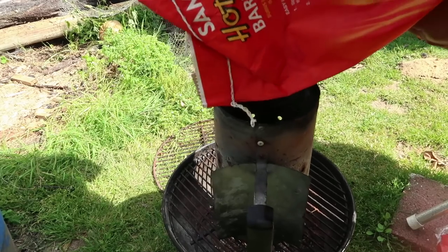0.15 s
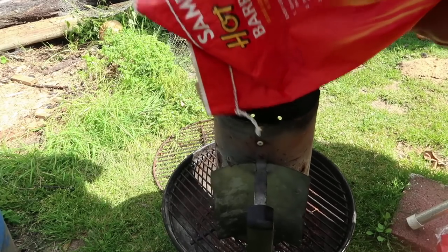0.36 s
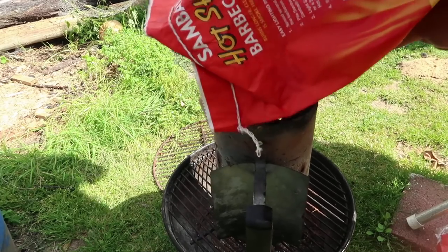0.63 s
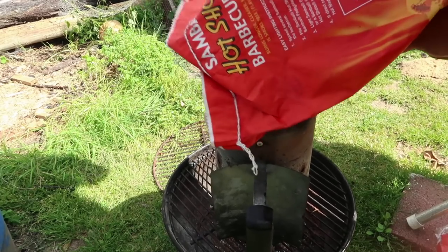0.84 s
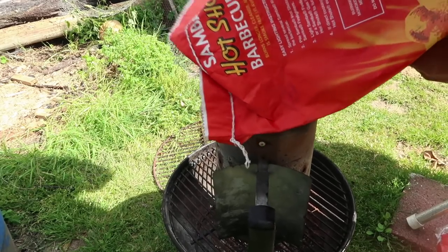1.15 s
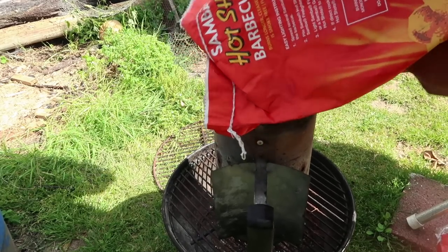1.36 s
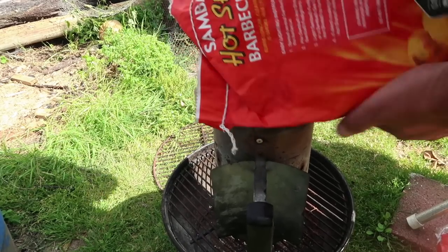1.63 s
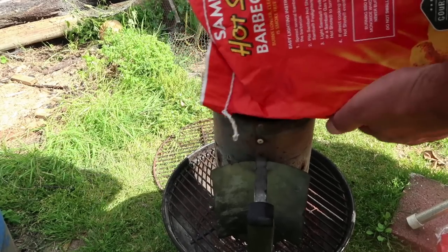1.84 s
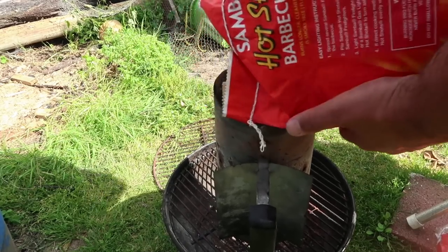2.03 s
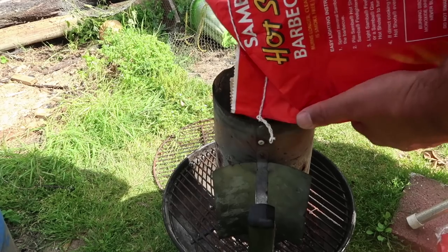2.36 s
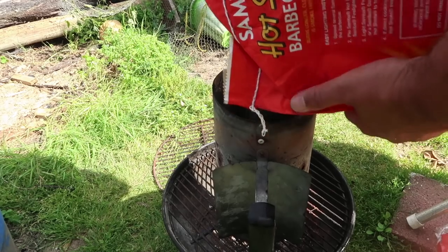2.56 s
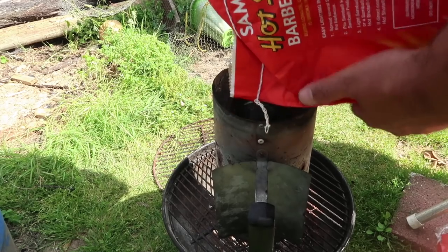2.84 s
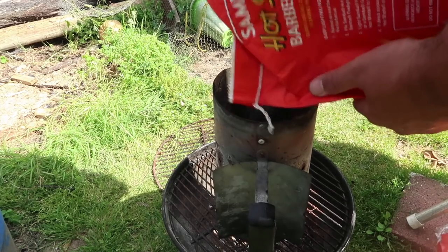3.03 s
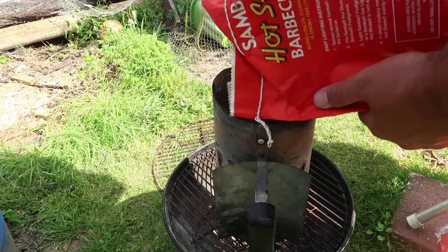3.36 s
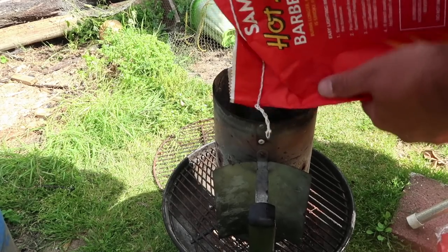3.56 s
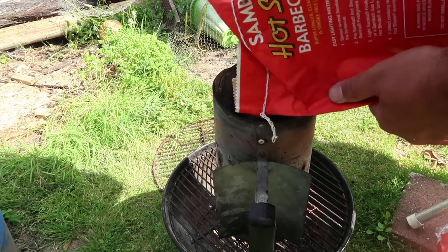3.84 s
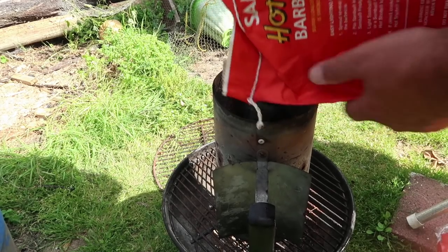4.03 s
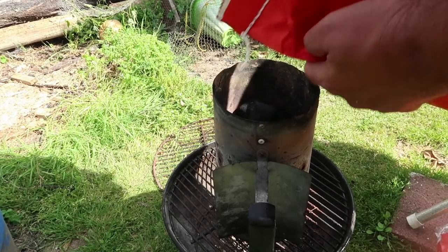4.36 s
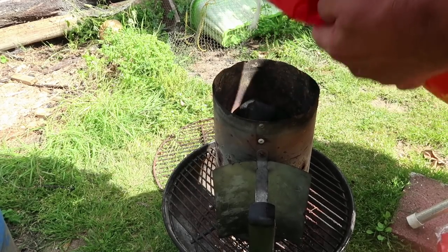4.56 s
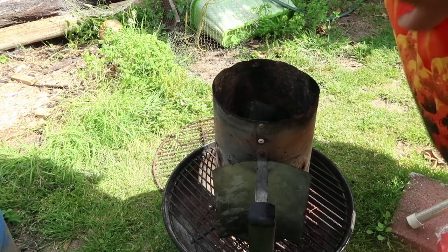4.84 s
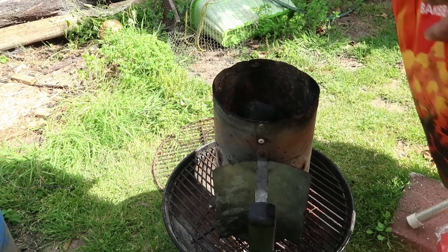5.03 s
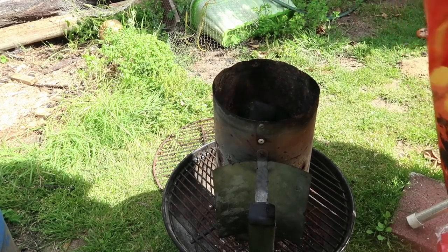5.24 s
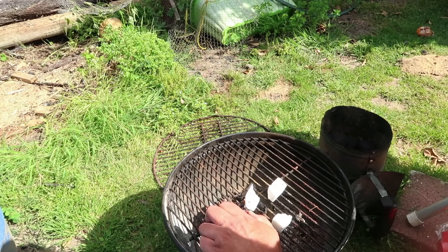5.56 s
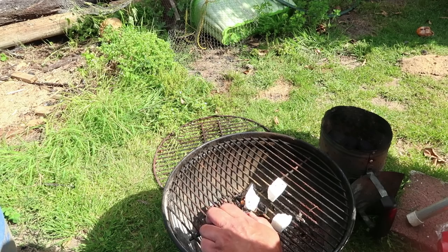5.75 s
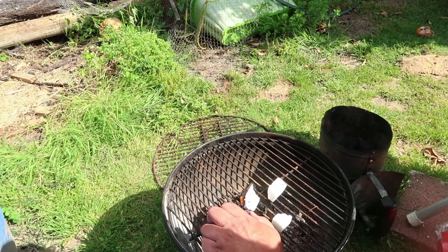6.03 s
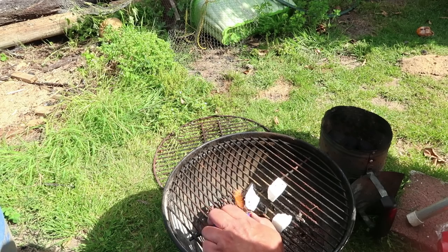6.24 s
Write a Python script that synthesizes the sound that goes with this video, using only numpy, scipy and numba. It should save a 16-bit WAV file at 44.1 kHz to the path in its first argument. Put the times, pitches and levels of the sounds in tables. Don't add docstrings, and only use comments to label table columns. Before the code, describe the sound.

Close up outdoors, charcoal briquettes pour from a paper sack into a metal chimney: dry knocks, brittle clacks and sliding grit over hollow thumps, with a brief metallic ring. The flow comes in surges, thins midway, then returns in heavier bursts. At about 5.3 seconds it cuts off to soft garden air, far traffic, a tiny brush on the grate and a faint hoarse bird.

```python
import sys
import numpy as np
from scipy import signal
from scipy.fft import rfft, irfft
from scipy.io import wavfile
from scipy.ndimage import uniform_filter1d, map_coordinates
from numba import njit

SR = 44100
rng = np.random.default_rng(int(sys.argv[2]) if len(sys.argv) > 2 else 0)


def store_pcm(level_fs):
    pcm = np.round(np.clip(level_fs, -1, 1) * 32767).astype(np.int16)
    wavfile.write(sys.argv[1], SR, np.atleast_2d(pcm).T)


def invert_db(level):
    return 10 ** (np.asarray(level, dtype=float) / 20)


N = 282240
POUR_END_S = 5.353


def read(table, hz):
    x, y = np.transpose(table)[:2]
    return np.interp(np.log(hz), np.log(np.maximum(x, 1)), y)


def walk(rate):
    k = int(SR / rate)
    held = np.repeat(rng.standard_normal(N // k + 1), k)
    return 1.4 * uniform_filter1d(uniform_filter1d(held, k), k)[:N]


def high_pass(hz, x):
    return signal.sosfilt(signal.butter(3, hz, "high", fs=SR, output="sos"), x)


@njit
def add(out, start, turn, fade, gain):
    for k in range(len(start)):
        i = int(start[k]) + 1
        late = i - start[k]
        p = np.exp(1j * turn[k] - fade[k])
        z = gain[k] * np.exp((1j * turn[k] - fade[k]) * late)
        soft, q = np.exp(-turn[k] * late), np.exp(-turn[k])
        for j in range(i, min(i + int(5 / fade[k]), len(out))):
            out[j] += z.imag * (1 - soft)
            z, soft = z * p, soft * q


def rings(s, hz, cycles, gain, place):
    # frequency in Hz, left minus right in dB
    port_balance = [(60, 0.0), (110, 0.0), (200, 0.0), (380, -0.5), (700, -1.0), (1290, -1.5), (2380, -1.5),
                    (4400, -1.5), (8120, -1.0), (15000, -0.5)]
    # frequency in Hz, spread between ports in dB, by where a lump strikes
    port_shade = [(700, 0), (2500, 2), (5000, 7), (8000, 7), (13000, 2.5)]
    # frequency in Hz, lag of the left port in samples
    port_lag = [(1000, .8), (5000, .85), (9000, 1.45), (15000, 1.5)]
    out = np.zeros((2, N))
    hz = np.clip(hz, 30, .38 * SR)
    pan = invert_db((read(port_balance, hz) + read(port_shade, hz) * place) / 2)
    lag = read(port_lag, hz) * (1 - .3 * place)
    turn = (2 * np.pi * hz / SR).ravel()
    fade = (hz / SR / cycles).ravel()
    for side, late, share in zip(out, (lag, 0 * lag), (pan, 1 / pan)):
        add(side, (s * SR + 8 + late).ravel(), turn, fade, (gain * share).ravel())
    return out


def whine():
    # frequency in Hz, rms level in dB
    tone = [(13001, -90)]
    (hz, db), = tone
    return np.sqrt(2) * invert_db(db + 3 * walk(30)) * np.sin(2 * np.pi * hz * np.arange(N) / SR)


def garden():
    # frequency in Hz, level in dB per Hz
    hum_db = [(12, -34), (20, -14), (53, -6.5), (72, -13), (108, -1.5), (132, -12.5), (178, -9), (337, -19),
              (398, -16.5), (560, -21), (720, -17.5), (900, -23.5), (1830, -31), (3860, -37.5),
              (11500, -51.5), (12800, -39), (15000, -64)]
    # frequency in Hz, side minus mid in dB
    width_db = [(60, -39), (110, -53), (200, -27), (380, -16), (700, -23), (1290, -16), (2380, -15),
                (4400, -13), (8120, -14), (15000, 0)]
    level_db, swell_db, flicker_db = -44.5, .3, .6
    f = np.maximum(np.fft.rfftfreq(N, 1 / SR), 20)
    mid, side = (rfft(rng.standard_normal(N)) * invert_db(read(hum_db, f)) for _ in range(2))
    side = (4.0 * side - .6j * mid) * invert_db(read(width_db, f))
    ports = np.array([mid + side, mid - side])
    rustle_db = 3.9 * np.exp(-((np.arange(N) / SR - 5.93) / .025) ** 2)
    out, swell = 0, walk(1.6)
    for hz in 22 * 2 ** np.arange(0., 10.):
        band = np.maximum(1 - abs(np.log2(f / hz)), 0)
        band_db = swell_db * swell + flicker_db * walk(12.0) + rustle_db * (hz > 1500)
        out = out + invert_db(band_db) * irfft(ports * band, N)
    return out * invert_db(level_db) / np.sqrt(np.mean(out.mean(axis=0) ** 2))


def bird():
    # start in seconds, length in seconds, start pitch in Hz, end pitch in Hz, level in dB
    slurs = [
        (6.125, .06, 4050, 3800, -53),
        (6.172, .025, 3600, 3450, -50),
        (6.19, .04, 3200, 3200, -51),
        (6.215, .075, 4480, 4560, -57),
        (6.32, .1, 4550, 4550, -58),
        (6.33, .045, 3900, 3800, -52),
        (6.355, .045, 3400, 3250, -54),
        (6.368, .032, 3000, 2900, -52),
    ]
    out, t = np.zeros(N), np.arange(int(.1 * SR)) / SR
    for s, length, a_hz, b_hz, db in slurs:
        u = np.clip(t / length, 0, 1)
        waver, flutter = uniform_filter1d(rng.standard_normal((2, len(t))), size=200) * 14
        hz = (a_hz + (b_hz - a_hz) * u) * (1 + 0.025 * waver * (a_hz < 4300))
        tone = np.sin(2 * np.pi * np.cumsum(hz) / SR)
        note = invert_db(db - 7.5 + 3 * flutter) * np.sin(np.pi * u) * tone
        i = int(s * SR)
        out[i:][:len(t)] += note[:N - i]
    left_echo = np.roll(out, 410) + np.roll(out, 930)
    right_echo = np.roll(out, 570) + np.roll(out, 1210)
    return (out + 0.8 * np.array([left_echo, right_echo])) * (np.arange(N) > SR)


def bumps():
    # time in seconds, level in
    # dB, pitch in Hz
    sack_jerks = [(.036, -15, 794), (.047, -8, 750), (0.487, -32, 105), (0.614, -18, 129),
                  (1.145, -26, 111), (1.467, -28, 108), (1.569, -19, 96.9), (2.62, -18, 125),
                  (3.1, -18.5, 127), (3.349, -17, 102.5), (3.642, -18.5, 96.9), (4.373, -17, 281),
                  (4.383, -29, 114), (4.672, -15.5, 131), (4.907, -17, 121)]
    # time in seconds, level in dB, pitch in Hz
    air_thumps = [(0.174, -17, 238), (0.489, -8, 275), (0.523, -24, 213), (0.718, -8, 220),
                  (0.803, -19, 242), (0.861, -11, 163), (0.889, -3.5, 384), (0.974, -26, 393),
                  (1.019, -23, 263), (1.058, -15, 213), (1.089, -13, 260), (1.106, -4, 212),
                  (1.153, -3, 199), (1.238, -18, 223), (1.319, -16, 237), (1.362, -11, 365),
                  (1.398, -15, 361), (1.452, -14, 231), (1.529, -13, 390), (1.676, 1, 238),
                  (1.854, -11, 228), (2.134, -18, 362), (2.335, -17, 280), (2.452, -26, 280),
                  (2.553, -17, 356), (2.591, -10.5, 210), (2.622, -9, 291), (2.697, -18, 247),
                  (2.74, -9, 268), (2.859, -10, 226), (3.009, -4, 286), (3.108, -17, 262),
                  (3.286, -15, 264), (3.354, -15, 218), (3.509, -28, 326), (3.596, -19, 207),
                  (3.649, -6.5, 285), (3.684, -10, 331), (3.714, -13, 417), (3.787, -8, 268),
                  (3.828, -13, 266), (4.176, -18.5, 267), (4.277, -12, 346), (4.338, -18, 370),
                  (4.391, -21, 371), (4.507, -23, 231), (4.587, -22, 272), (4.678, -0.5, 400),
                  (4.708, -8, 266), (4.851, -13, 264), (4.9, -7, 231), (4.996, -9.5, 175),
                  (5.165, -20, 420), (5.167, -9, 211), (5.248, -9.5, 189), (5.284, -14, 178)]
    out = 0
    for table, gain_db, cycles, early_s in (sack_jerks, 4, 1.25, -0.006), (air_thumps, -5, 3.1, 0.00091):
        s, db, hz = np.transpose(table)
        out = out + rings(s - early_s, hz, cycles + 0 * s, invert_db(db + gain_db), 0 * s)
    return out


def lumps(count=3):
    # time in seconds, main ring in Hz, level in dB, bite in dB
    thuds = [(.502, 420, -19, -6), (.529, 2500, -10, -12), (.8179, 433, -13, 0), (1.1634, 900, -5, -10),
             (1.3622, 726, -14, -15), (1.4018, 494, -16.5, 11), (1.4562, 272, -16, -8),
             (1.5506, 272, -12, 6), (1.591, 2930, -23.5, 29.5), (1.68, 350, -10, 8),
             (2.6343, 1980, -22.5, 21), (2.8611, 1870, -16, 19.5), (3.0116, 330, -7, -20),
             (3.51, 370, -21, 7), (3.650, 3300, -10, -11), (3.6901, 2190, -6.5, 2),
             (3.7234, 2360, -13, 17.5), (3.789, 388, -11.5, -1), (4.1789, 254, -19.5, -12),
             (4.2792, 502, -14.5, 4), (4.3405, 520, -8, 1.5), (4.3945, 340, -10.5, -25),
             (4.6082, 3050, -27, 18), (4.685, 310, -12, -3), (4.923, 327, -18, -12),
             (4.8474, 7760, -16.5, 0), (4.8982, 390, -10.5, -11), (5.0442, 428, -13.5, -5),
             (5.2837, 530, -10, -5), (5.3451, 393, -16, 13.5)]
    # time in seconds, main ring in Hz, level in dB, bite in dB
    knocks = [(.0903, 864, -16.5, -9), (.5372, 570, -19, -7), (.834, 513, -14, -12), (.8913, 700, -16, 10),
              (1.1082, 388, -9, -14), (1.437, 630, -30, 5), (1.4737, 450, -26, 20), (1.724, 1650, -21.5, 4),
              (1.807, 730, -21.5, 17), (1.92, 775, -22, 4), (1.9681, 2670, -17.5, 8), (2.3, 554, -33, -7),
              (2.4573, 634, -15, -13), (3.488, 1410, -30, -6), (3.7689, 1530, -18, 2),
              (4.3205, 830, -20, 6), (4.448, 526, -28, -2), (4.7703, 544, -16, 12.5),
              (5.244, 1700, -14, -9)]
    # time in seconds, main ring in Hz, level in dB, bite in dB
    clacks = [(.344, 1000, -18.5, -31), (2.3448, 3280, -31.5, 14), (2.458, 1930, -19, -7),
              (2.554, 377, -14.5, -10), (2.9665, 2370, -24.5, 13), (3.212, 447, -17.5, -15),
              (3.2549, 3070, -24, 10), (3.3326, 3470, -25.5, 9), (3.76, 2520, -25, -3),
              (3.902, 2540, -26, -17), (3.9171, 2350, -35, -6), (3.9634, 2780, -30.5, 10.5),
              (4.3279, 2480, -17, -9), (4.5262, 6630, -30, 12.5), (4.669, 1900, -28, 0),
              (4.7067, 766, -16.5, 4), (5.0959, 1910, -27.5, 16.5), (5.216, 1900, -19, -16)]
    # time in seconds, level in dB, main ring in Hz, bite in dB
    ticks = [(0.1714, -34, 705, -8), (0.4903, -13, 784, -13), (0.7239, -26, 596, -6),
             (0.8631, -4, 1570, -7), (0.9605, -20, 735, 3), (0.9774, -15, 842, -7), (1.0047, -13, 690, -12),
             (1.074, -13, 708, 0), (1.2797, -22, 888, 2), (1.3653, -12.5, 800, 5), (1.576, -18, 1610, 11),
             (2.1254, -28, 630, 2), (2.59, -22, 740, 0), (2.667, -15, 825, 2), (2.7422, -25, 710, 9),
             (2.9262, -23, 716, 4), (3.106, -20.5, 920, 7), (3.6433, -21, 751, 3), (4.211, -22, 2410, 0),
             (4.2694, -19, 684, -7), (4.404, -23, 829, -5), (4.6525, -19, 842, -2), (4.7953, -17, 1090, 0),
             (4.8208, -21, 1070, 7), (4.9944, -14, 1070, -10), (5.3194, -27, 1030, -2)]
    # lowest Hz, highest Hz
    part_hz = [(150, 500), (500, 1500), (1500, 4000), (4000, 15500)]
    thud_db = [-3.5, -8.5, -11, -21.5]
    knock_db = [-4.5, 0, -9.5, -19]
    clack_db = [-7, -6.5, -1.5, -10]
    tick_db = [-14, -7.5, -12, -18.5]
    per_bite = [0, .05, .3, 1]
    ticks = [(s, hz, db, bite) for s, db, hz, bite in ticks]
    rows = []
    for table, kind_db in (thuds, thud_db), (knocks, knock_db), (clacks, clack_db), (ticks, tick_db):
        for s, hz, db, bite in table:
            rows.append((s, hz, *(db + np.add(kind_db, bite * np.array(per_bite)))))
    s, hz, *part_db = np.transpose(rows)[:, :, None]
    low, high = np.repeat(part_hz, count, axis=0).T
    chance = rng.random((len(rows), 4, len(low))).transpose(1, 0, 2)
    rank = np.arange(len(low)) % count
    pitch = low * (high / low) ** ((rank + chance[0]) / count)
    main_rank = (count * np.log(hz / low) / np.log(high / low)).astype(int)
    main = (hz >= low) & (hz < high) & (rank == main_rank)
    pitch = np.where(main, hz, pitch)
    turns = (0.54 + 1.9 * chance[1] + 0.08 * main) * (pitch / 500) ** .5
    db = np.repeat(np.hstack(part_db), count, axis=1) + 10.0 * main - 1.5
    sign = np.sign(chance[2, :, :1] - .5) * np.sign(chance[2] - .2)
    gain = invert_db(db) * np.sqrt(4 * 0.0029 * pitch / turns / count) * sign
    return rings(s + 0.000507 * chance[3] - .0006, pitch, turns, gain, 2 * chance[1, :, :1] - 1)


def load_db():
    # time in seconds, flow in dB, hardness in dB, sack flexing in dB
    pour_flow = [(0, -39.5, 10.5, -15), (.13, -28.5, 4, -7), (.3, -34.5, -3, -2), (.42, -30, 0, 2.5),
                 (.8, -21.5, 6.5, 1.5), (1.3, -31, 6.5, 1), (1.55, -25.5, -1, 5), (2.12, -38.5, 6, -1),
                 (2.42, -42, 6.5, 1), (2.6, -35.5, 8, 5.5), (3.1, -36, 8, 5.5), (3.35, -31.5, 2, 7.5),
                 (3.52, -38, 4.5, -4), (3.72, -27.5, 9, 7), (3.95, -49, 15, 8), (4.25, -36, 8, -1),
                 (4.9, -26, 2, -1.5), (5.35, -23, 5, 4)]
    # time in seconds, length in seconds,
    # level in dB, hardness in dB
    jolts = [(.178, 0.0044, -29, -22), (.496, 0.011, -14.5, -2.5), (.636, 0.018, -15.5, -2.5),
             (.866, 0.007, -21, 6), (1.088, 0.013, -19, 1.5), (1.111, 0.01, -13, -8),
             (1.169, 0.015, -11.5, -0.5), (1.242, .006, -18, -20), (1.68, 0.019, -7.5, -20),
             (1.752, 0.019, -23, 0), (1.934, 0.0075, -24, 1), (1.973, 0.026, -42, 17),
             (2.015, 0.02, -28, 4.5), (2.344, 0.0052, -14.5, -11), (2.484, 0.0063, -19, -6),
             (2.526, 0.032, -29.5, 4.5), (2.56, 0.0054, -31, -1), (2.669, 0.0071, -21, 5),
             (2.797, 0.012, -23, -19), (2.863, 0.012, -20.5, 3.5), (2.932, 0.0094, -27, 5.5),
             (3.218, 0.0092, -25, 5), (3.349, 0.035, -17, -0.5), (3.969, 0.0059, -31.5, 0),
             (4.45, 0.0061, -25, -1), (4.593, 0.015, -25, 3), (4.686, 0.026, -15.5, -1),
             (5.28, 0.02, -30, 9)]
    # time and length in seconds, level and hardness in dB
    spills = [(.046, 0.018, -9.5, -0.5), (.366, 0.056, -24, 0), (.53, 0.024, -17, -1.5),
              (.901, 0.029, -11, 0), (1.367, 0.012, -20, 1), (1.424, 0.011, -11.5, -9),
              (1.507, 0.01, -12.5, -4), (1.617, 0.072, -26.5, 13.5), (1.818, 0.028, -22.5, 2),
              (2.038, 0.038, -38.5, 15.5), (2.13, 0.029, -27.5, -9), (2.366, 0.028, -28.5, 8.5),
              (2.7, 0.018, -19, -8), (2.966, 0.03, -14, -0.5), (3.266, 0.081, -35.5, 12.5),
              (3.8, 0.025, -25.5, 3), (4.104, 0.023, -36, 8.5), (4.164, 0.11, -32.5, 7),
              (4.283, .008, -19, -6), (4.775, 0.012, -22, 2), (4.795, 0.04, -21, 1),
              (4.996, 0.025, -16.5, -8), (5.216, 0.0053, -12.5, -2), (5.258, .011, -20, -1),
              (5.32, 0.023, -19.5, -10)]
    # time and length in seconds, level and hardness in dB
    slides = [(.738, 0.056, -20, 3), (.821, 0.045, -18.5, 1.5), (1.014, 0.068, -19.5, -3.5),
              (1.321, .032, -30, 4), (1.48, 0.06, -20, 4), (1.593, 0.048, -18, 3),
              (2.247, 0.011, -22.5, -18), (2.632, 0.029, -19, 2.5), (2.745, 0.016, -23, -5),
              (3.012, 0.0098, -12, -18), (3.11, 0.0085, -14.5, -3), (3.61, 0.012, -27.5, 9.5),
              (3.658, 0.013, -19, 8), (3.714, 0.023, -8.5, -4.5), (3.851, 0.042, -19.5, -11),
              (4.338, 0.011, -29, 15.5), (4.513, 0.04, -21, -8), (4.902, 0.23, -19.5, -0.5),
              (5.07, 0.055, -19.5, 1.5)]
    slide_db = [0, -2, -8, -18]
    surge_db = [-42, -1.5, -6, -17]
    per_hard = [0, 0.054, 0.91, 1.06]
    ms = np.arange(int(1000 * N / SR)) / 1000
    t, *controls = np.transpose(pour_flow)
    flow_db, hard_db, flex_db = (np.interp(ms, t, c) for c in controls)
    boom_db = np.outer(np.arange(4) == 0, flex_db)
    power = invert_db(2 * (flow_db + boom_db + np.c_[slide_db] + np.outer(per_hard, hard_db)))
    for table, swell, fall in (jolts, 1.4, 1), (spills, .35, 1), (slides, 1, 0.31):
        for s, length, db, hard in table:
            reach_s = np.maximum(length * np.where(ms < s, swell, fall), .002)
            shape_db = -5.0 * abs((ms - s) / reach_s) ** 1.62
            power += invert_db(2 * (db + np.c_[surge_db] + hard * np.c_[per_hard] + shape_db))
    return 10 * np.log10(power)


def tumble(load, count, low_hz, size, db, spread_db, own_db, cycles):
    part_centre_hz = [130, 420, 1700, 5500]
    # frequency in Hz, level of the charcoal's rings in dB per octave
    coal_db = [(40, -69.5), (80, -14), (120, -5), (165, -3.5), (240, 1.5), (320, -3.5), (420, -3),
               (800, -3), (1600, -4), (3000, -2), (5500, -2), (8500, -3.5), (12000, -1), (15000, -1)]
    s = rng.random((count, 1)) * POUR_END_S + 0.001523 * rng.random((count, size))
    hz = low_hz * 2 ** (np.arange(size) + rng.random((count, size)))
    blow = np.minimum(rng.exponential(size=(count, 1)), 3)
    force = invert_db(spread_db * blow + own_db * np.clip(rng.standard_normal((count, size)), -2, 2))
    force = force / np.sqrt(np.mean(force ** 2)) * rng.choice([-1., 1.], (count, size))
    luck_db = 5.5 * np.clip(rng.standard_normal((count, size)), -2, 1)
    turns = cycles * invert_db(luck_db) * (hz / 500) ** 0.57
    part = np.interp(np.log(hz), np.log(part_centre_hz), np.arange(4))
    octave_db = read(coal_db, hz) + map_coordinates(load, [part, 1000 * s], order=1)
    gain = force * invert_db(db + octave_db) * np.sqrt(4 * hz / turns * POUR_END_S / count)
    return rings(s, hz, turns, gain, np.clip(rng.standard_normal((count, 1)), -2, 2))


def tube(dry):
    t60_s, tail_db = 0.051, -7.5
    t = np.arange(int(.12 * SR)) / SR
    tail = rng.standard_normal((3, len(t))) * invert_db(-60 * t / t60_s) * np.clip(t / 0.0052, 0, 1)
    own = signal.sosfilt(signal.butter(2, 2000, "high", fs=SR, output="sos"), tail[1:])
    tail = np.array([np.roll(tail[0], 1), tail[0]]) * 0.52 + own
    tail = tail / np.sqrt(np.sum(tail[0] ** 2))
    return dry + invert_db(tail_db) * signal.fftconvolve(dry, tail, axes=1)[:, :N]


def metal_wall(pour):
    wall_hz, width_hz, wall_db = 1560, 130, -10
    return pour + invert_db(wall_db) * signal.lfilter(*signal.iirpeak(wall_hz, wall_hz / width_hz, fs=SR), pour)


def scene():
    load = load_db()
    clatter = tumble(load, count=2200, low_hz=44.74, size=9, db=-4.5, spread_db=3.5, own_db=2.5, cycles=2.63)
    grit = tumble(load, count=11000, low_hz=149.0, size=7, db=-3.5, spread_db=1.0, own_db=0.0, cycles=1.24)
    sack_sized = high_pass(47, clatter + bumps())
    lump_sized = high_pass(94, grit + lumps())
    pour = metal_wall(tube(sack_sized + lump_sized))
    fade_s = 0.004
    before = np.clip((POUR_END_S + fade_s - np.arange(N) / SR) / fade_s, 0, 1)
    return pour * before + garden() + bird() + whine()


def low_pass(x):
    return signal.sosfilt(signal.butter(12, 15900, fs=SR, output="sos"), x)


def record(dry):
    top_hz, drive = 12600, .9
    heard = signal.sosfilt(signal.butter(6, top_hz, fs=SR, output="sos"), dry)
    mix = np.tanh(drive * heard) / drive
    return low_pass(mix)


dry = scene()
out = record(dry)
store_pcm(out)
```